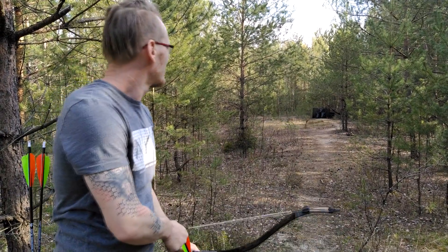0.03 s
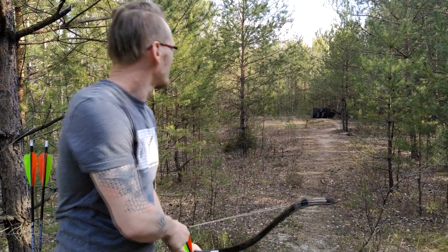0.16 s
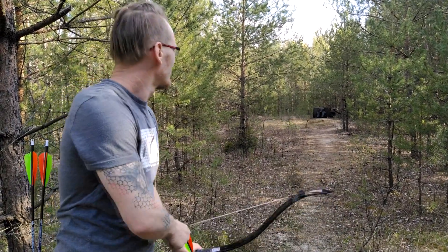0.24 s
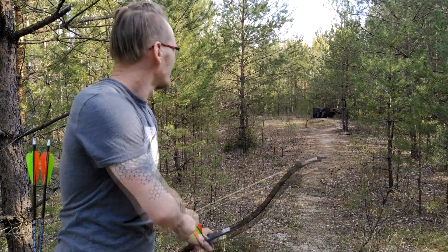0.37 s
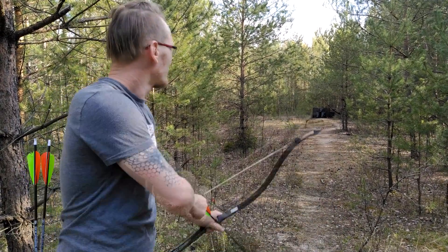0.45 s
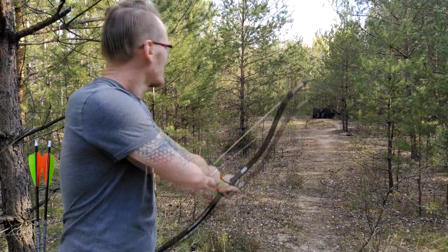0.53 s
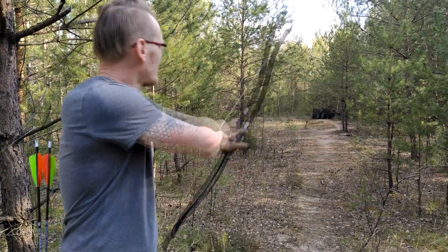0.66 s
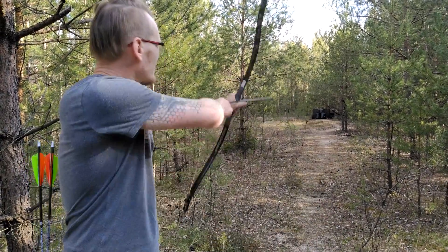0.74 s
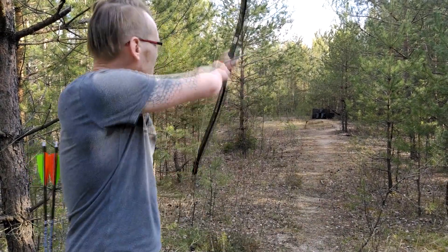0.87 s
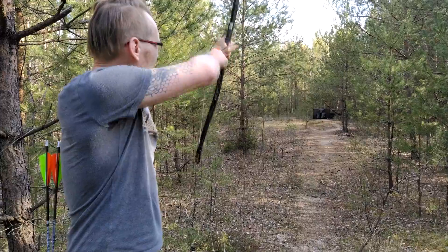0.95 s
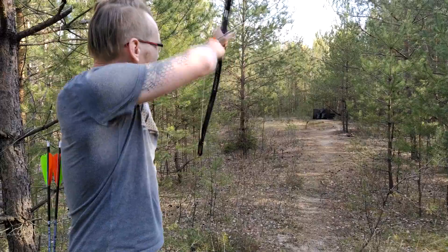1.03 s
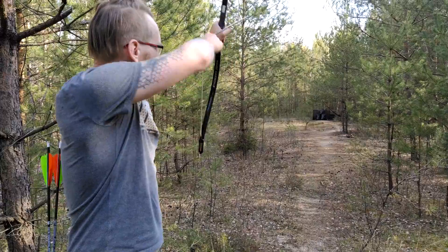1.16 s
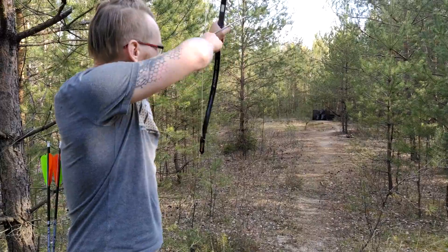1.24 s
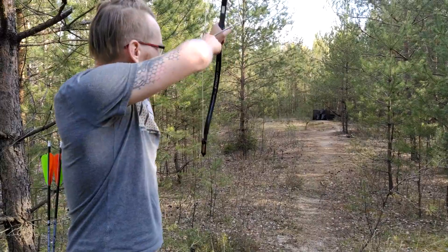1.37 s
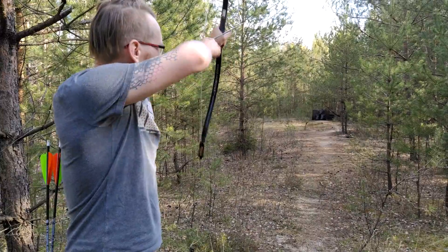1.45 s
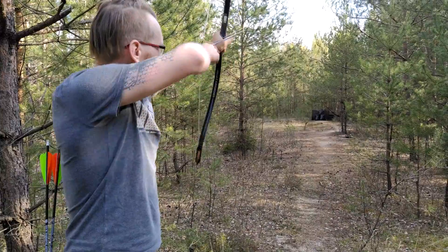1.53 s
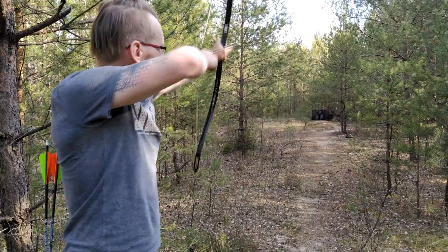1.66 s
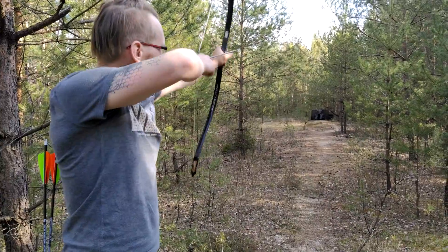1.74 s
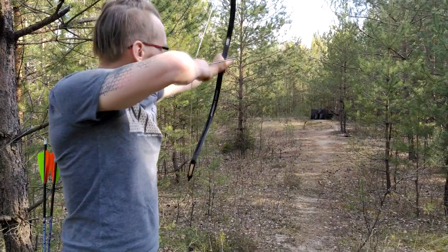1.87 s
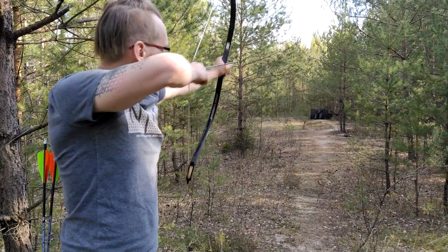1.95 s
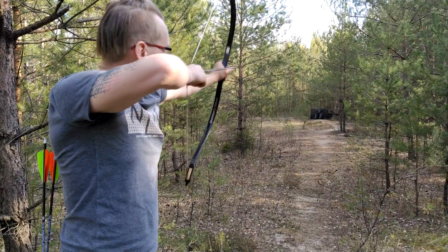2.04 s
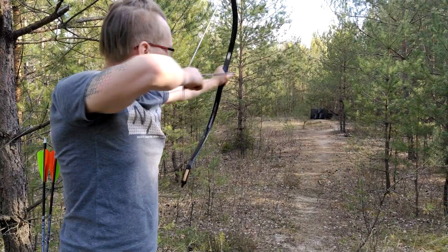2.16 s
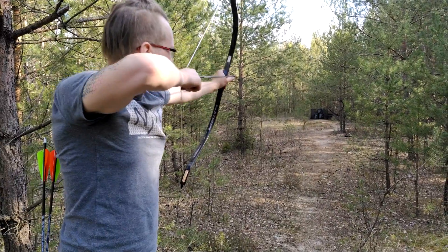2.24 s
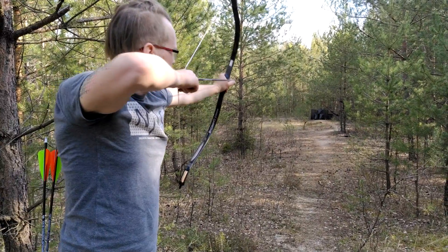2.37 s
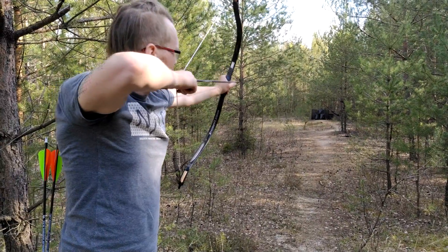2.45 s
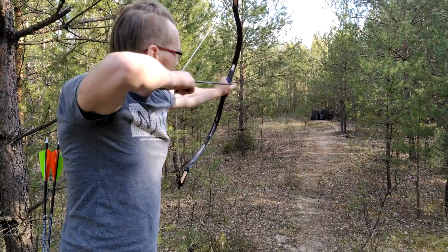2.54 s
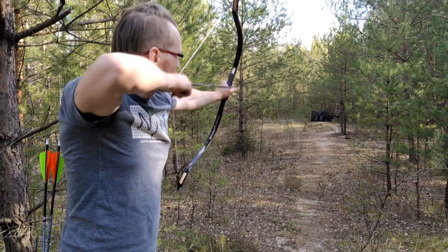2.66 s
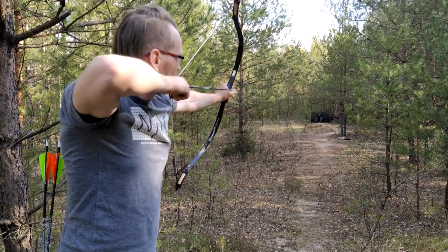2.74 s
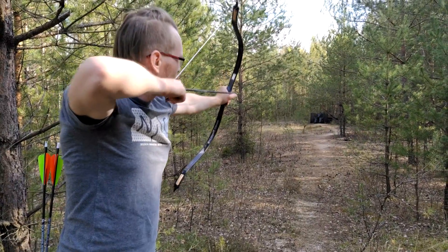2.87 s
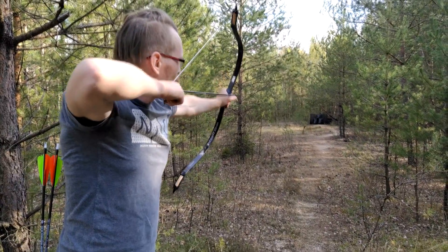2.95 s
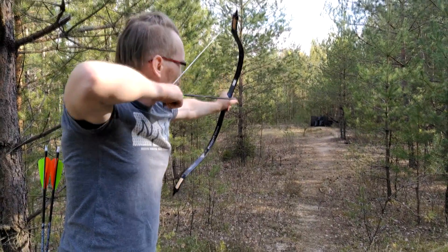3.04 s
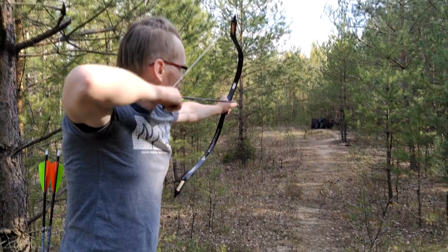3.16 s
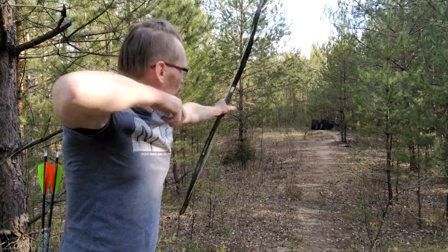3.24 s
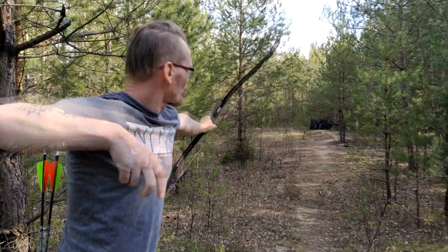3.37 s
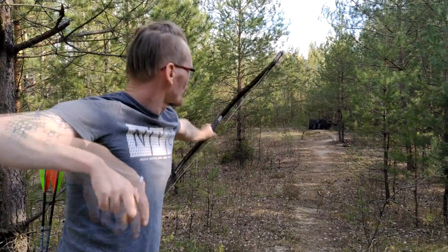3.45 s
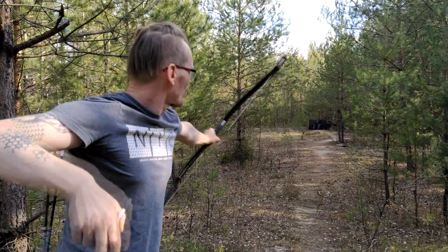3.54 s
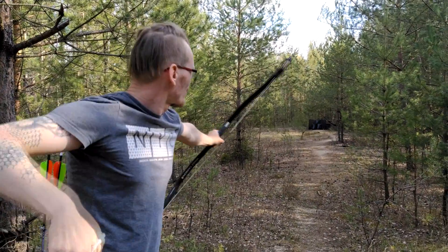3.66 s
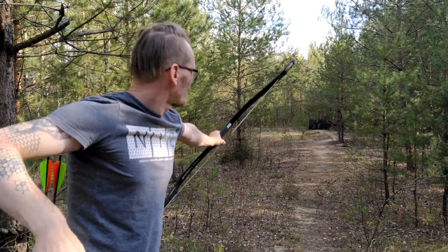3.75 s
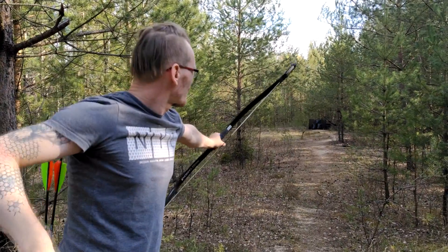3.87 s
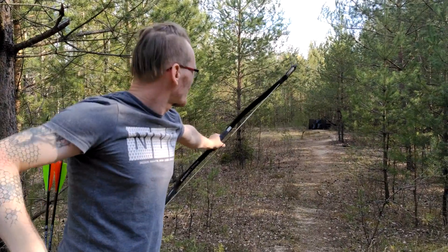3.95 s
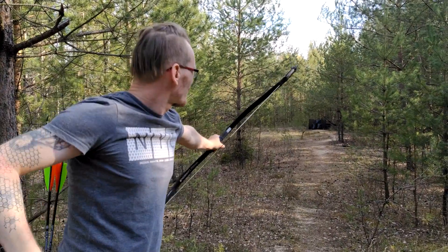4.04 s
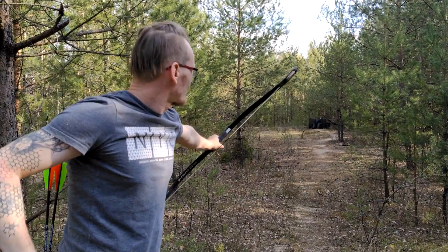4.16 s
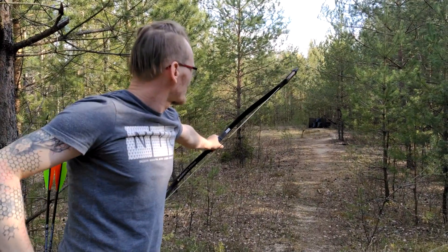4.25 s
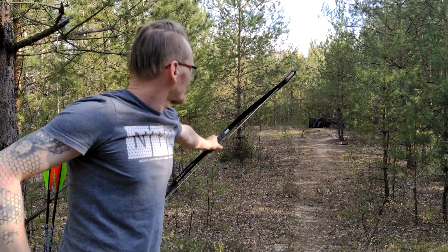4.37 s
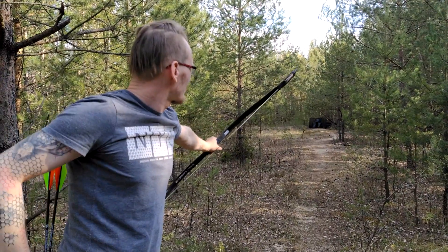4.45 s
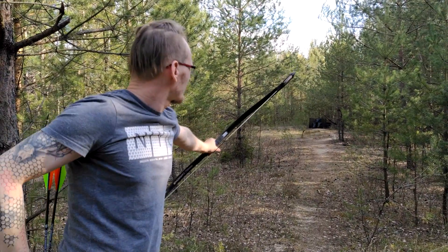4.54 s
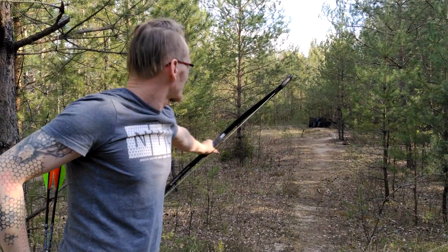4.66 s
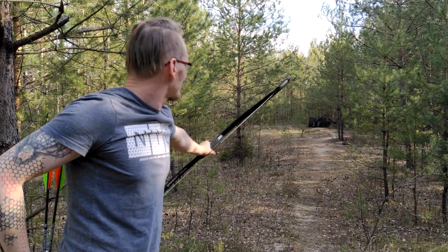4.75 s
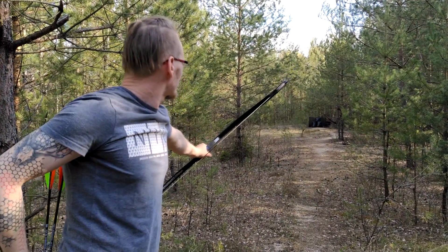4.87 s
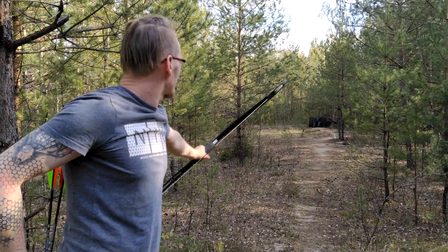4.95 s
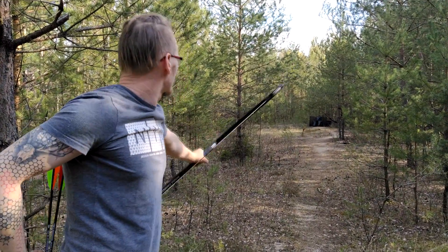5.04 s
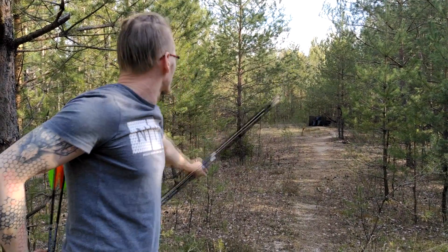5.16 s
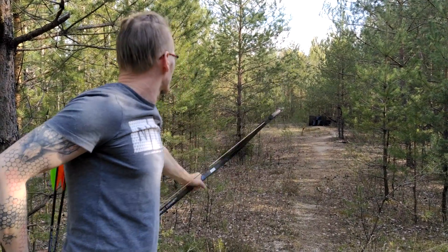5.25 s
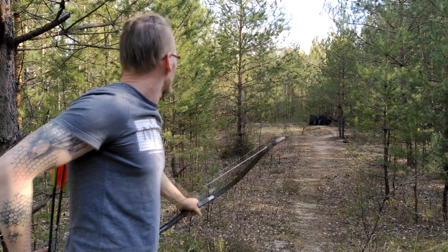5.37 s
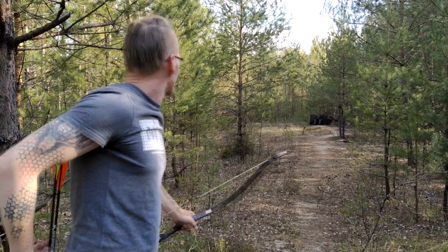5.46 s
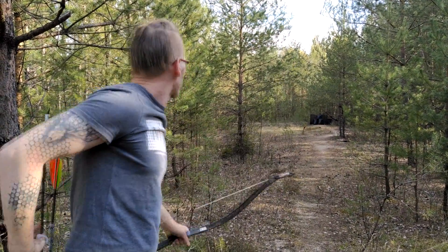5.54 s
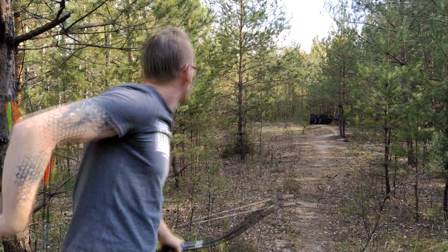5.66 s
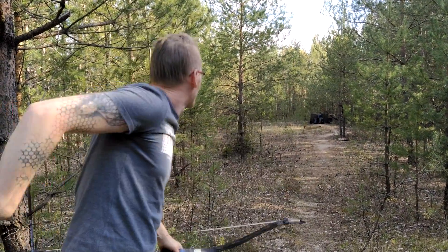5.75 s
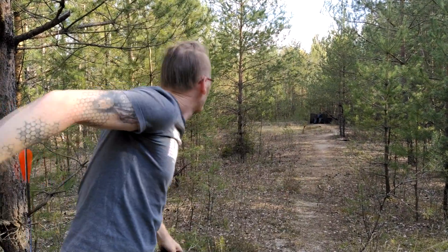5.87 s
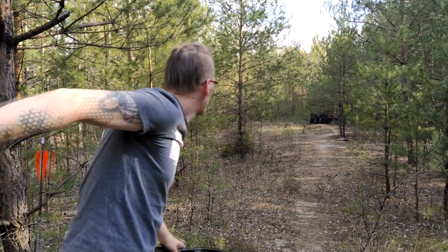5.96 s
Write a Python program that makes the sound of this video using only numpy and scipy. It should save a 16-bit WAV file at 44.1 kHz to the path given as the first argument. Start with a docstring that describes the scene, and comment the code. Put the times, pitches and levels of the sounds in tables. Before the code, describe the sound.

In soft forest air a songbird trills while an archer draws, with faint sleeve rustle and small arrow ticks close to the microphone. The bowstring releases with a loud, sharp snap. Under a second later the arrow thuds into a distant target and echoes among the trees. Then the next arrow rustles, squeaks and clicks out of the quiver, over a very faint far engine hum.

```python
"""Bow shot in a pine forest

An archer draws: sleeves brush, the arrow ticks on the bow, slides off, and the string slams home.
The arrow thuds into a distant target and the trunks scatter the sound; then the next arrow rustles
and squeaks out of a quiver. A songbird trills through the draw and closes with falling slurs,
over soft forest air and, near the end, a faint far engine."""
import sys
import numpy as np
from scipy import signal
from scipy.fft import rfft, irfft
from scipy.io import wavfile

SR = 44100
rng = np.random.default_rng(int(sys.argv[2]) if len(sys.argv) > 2 else 0)


def dump_mix(stems):
    """Bounce the given channels to the path in sys.argv[1] as a 16-bit WAV at rate SR."""
    frames = np.atleast_2d(stems).T  # one column per channel
    limited = np.clip(frames, -1, 1)  # hard clip at full scale
    pcm = np.round(limited * 32767).astype(np.int16)
    wavfile.write(sys.argv[1], SR, pcm)


N = 265041
TIME = np.arange(N) / SR


def from_db(db):
    """Decibels to gain."""
    return 10 ** (np.asarray(db) / 20)


def unit_rms(x):
    """Scale to unit power."""
    return x / np.sqrt(np.mean(x ** 2) + 1e-20)


def at_hz(rows, hz, column=1):
    """Read one column of a table on a log-frequency axis."""
    rows = np.array(rows)
    return np.interp(np.log(np.maximum(hz, 1)), np.log(rows[:, 0]), rows[:, column])


def phase(hz):
    """Running phase of a moving frequency."""
    return 2 * np.pi * np.cumsum(hz) / SR


def drift(rate_hz):
    """Random wander of unit power."""
    knots = rng.standard_normal(16384)
    return unit_rms(np.interp(TIME * rate_hz, np.arange(len(knots)), knots))


def swell(peak_s, rise_s, hold_s, fall_s):
    """Envelope that grows to 1, holds, and dies away."""
    rise = np.minimum(TIME - peak_s, 0) / rise_s
    fall = np.maximum(TIME - peak_s - hold_s, 0) / fall_s
    return np.exp(np.maximum(rise - fall, -40))


def colour(x, spectrum, size=2048):
    """Minimum-phase filter with the given spectrum."""
    gain = from_db(at_hz(spectrum, np.arange(size + 1) * SR / (2 * size)))
    cepstrum = irfft(np.log(gain))
    cepstrum[1:size] *= 2
    cepstrum[size + 1:] = 0
    return signal.oaconvolve(x, irfft(np.exp(rfft(cepstrum))))[:N]


def low_pass(x, hz):
    """Steep treble cut."""
    return signal.sosfilt(signal.ellip(10, .1, 70, hz, fs=SR, output="sos"), x)


def cracks(rows):
    """Each contact chatters: a noise burst that starts at once and dies away."""
    power = np.zeros(N)
    for start_s, db, decay_s, *_ in rows:
        at = round(start_s * SR)
        age = TIME[:min(N - at, SR // 4)]
        power[at:at + len(age)] += (from_db(db) * np.exp(-age / decay_s)) ** 2
    return np.sqrt(power) * rng.standard_normal(N)


def struck(rows, modes, db_column=1):
    """Each blow rings the body's modes as dying sines; neighbours swing in opposite senses."""
    age, out = TIME[:SR // 2], np.zeros(N)
    ring = sum((-1) ** k * from_db(db - 60 * age / t60_s) * np.sin(2 * np.pi * hz * age)
               for k, (hz, db, t60_s) in enumerate(modes))
    for row in rows:
        at = round(row[0] * SR)
        out[at:at + len(age)] += from_db(row[db_column]) * ring[:N - at]
    return out


def rubbing(spectrum, grain_db, clump_db):
    """Fibres catch and slip: noise in tiny grains that come in clumps."""
    grains = rng.standard_normal(N) * from_db(grain_db * drift(1200) + clump_db * drift(110))
    return unit_rms(colour(grains, spectrum))


# String slapping and rattling on the bow. Each row: start in seconds, level in dB, decay in seconds.
STRING_SLAPS = [(3.2886, -12, 0.0029), (3.2912, -7, 0.0035), (3.2972, -16, 0.0067), (3.3095, -34.5, 0.019)]
# Slap spectrum. Each row: frequency in Hz, gain in dB.
SLAP_COLOUR = [(30, -22), (150, -3.5), (800, -2), (1200, -12), (1600, -6), (2300, 3.5), (3000, -1),
               (3900, -0.5), (4800, -4.5), (7000, -7), (11500, -1.5), (13500, -22)]
# String stopping the limbs. Each row: start in seconds, level in dB.
LIMB_STOP = [(3.2941, -14)]
# Bow and string modes. Each row: frequency in Hz, level in dB, T60 in seconds.
BOW_MODES = [(85.4, -36, 0.49), (167, -19.5, 0.22), (205, -14.5, 0.042), (253, -18.5, 0.2),
             (403, -7.5, 0.028), (466, -9, 0.085), (594, -7, 0.048), (727, -8, 0.037), (1238, -19, 0.052),
             (2300, -5, 0.049), (3020, 4.5, 0.016)]


def string_slam():
    """The string snaps taut and the limbs ring."""
    return colour(cracks(STRING_SLAPS), SLAP_COLOUR) + struck(LIMB_STOP, BOW_MODES)


# Friction spectrum. Each row: frequency in Hz, gain in dB.
SLIDE_COLOUR = [(100, -16), (600, -2.5), (1300, -8.5), (2200, 3.5), (3000, 3), (5000, -4.5), (7000, -9),
                (11500, -3), (13500, -24.5)]
# String kicking the shaft. Each row: start in seconds, level in dB.
SHAFT_KICK = [(3.2712, -9)]
# Shaft modes. Each row: frequency in Hz, level in dB, T60 in seconds.
SHAFT_MODES = [(195, -26, 0.054), (722, -3.5, 0.033), (830, -3, 0.019), (1116, -18.5, 0.048)]


def release():
    """The string scuffs off the fingers and kicks the shaft, which rubs past the bow."""
    release_s = SHAFT_KICK[0][0]
    scuff = from_db(-15.5) * swell(release_s, rise_s=0.0029, hold_s=0, fall_s=0.0045)
    rub = from_db(-26.5) * swell(release_s, rise_s=0.002, hold_s=0.012, fall_s=0.009)
    friction = np.hypot(scuff, rub) * rng.standard_normal(N)
    return colour(friction, SLIDE_COLOUR) + struck(SHAFT_KICK, SHAFT_MODES)


# Arrow piercing and stopping. Each row: start in seconds, crack in dB, decay in seconds, push in dB.
TARGET_BLOWS = [(4.0174, -18, 0.0031, -43), (4.0225, -23.5, 0.0039, -39), (4.0251, -28.5, .008, -17)]
# Crack spectrum. Each row: frequency in Hz, gain in dB.
TARGET_COLOUR = [(30, -25), (120, 4.5), (750, 5), (1200, 0), (1800, 3), (2200, 0), (3150, 13), (4300, -5.5),
                 (6000, -4), (8000, 1.5), (9300, -15), (11500, -10.5), (13000, -39)]
# Target modes. Each row: frequency in Hz, level in dB, T60 in seconds.
TARGET_MODES = [(99, -17.5, 0.079), (213, -7.5, 0.025), (295, -3, 0.028), (810, -2, 0.011),
                (1650, -20, 0.04)]
# Scatter on the long path back. Each row: frequency in Hz, gain in dB, T60 in seconds.
FAR_PATH = [(70, -8, 0.47), (140, -2, .45), (446, -4.5, 1), (800, 4.5, 2), (1490, 0, 1.26),
            (2840, 1.5, 0.73), (5460, -13.5, 0.62), (10000, -19.5, 0.23), (13000, -46, 0.27)]


def target(echo_db=3.5):
    """The point cracks in twice, then the target thuds; the wood echoes it all as one blow."""
    piercing = colour(cracks(TARGET_BLOWS), TARGET_COLOUR)
    thud = struck(TARGET_BLOWS, TARGET_MODES, db_column=3)
    impulse = np.zeros(N)
    impulse[round(TARGET_BLOWS[0][0] * SR)] = from_db(echo_db)
    return piercing + thud + trees(impulse, FAR_PATH, build_s=0.0048, uneven_db=-1)


# Arrow on the bow during the draw. Each row: start in seconds, level in dB, decay in seconds.
DRAW_TICKS = [(.631, -53, 0.0051), (2.9200, -38, 0.001), (2.9252, -51, 0.0014), (2.9785, -39, 0.0011)]
# Arrows on hand, bow and quiver; a thin clink as the bow swings out after the shot.
# Each row: start in seconds, tick in dB, decay in seconds, ring in dB.
ARROW_TICKS = [(3.2275, -44.5, 0.0037, -39), (5.039, -60, 0.015, -51), (5.1016, -59, .008, -53),
               (5.203, -53, 0.012, -47), (5.2182, -35, 0.007, -57), (5.4553, -51, .003, -52),
               (5.5182, -49, 0.0034, -58), (5.581, -48.5, 0.0058, -48), (5.8513, -43, 0.014, -64),
               (5.867, -22.5, 0.0032, -33.5), (5.8742, -27, 0.0019, -33), (5.9392, -49.5, .005, -55)]
CLINK = [(3.4245, -38.5, 0.0058, -44)]
# Tick spectra. Each row: frequency in Hz, gain in dB.
DRAW_TICK_COLOUR = [(300, -31), (3000, -2), (4300, 3), (5600, 9), (7500, -2), (11000, 10), (15000, -4)]
TICK_COLOUR = [(300, -1.5), (1500, -1), (3200, -3.5), (4400, -5), (5500, 5), (7300, 0.5), (9300, 13),
               (11500, 6.5), (13000, -14), (15500, -24)]
# Arrow and clink modes. Each row: frequency in Hz, level in dB, T60 in seconds.
ARROW_MODES = [(317, -18.5, 0.22), (835, -13, 0.038), (1780, -14, 0.035), (3140, -5, 0.052),
               (3870, -10.5, 0.05)]
CLINK_MODES = [(4910, 3, 0.068), (5507, -7, 0.072), (7340, -3, 0.088), (8400, -2, 0.061), (9862, -3, 0.081)]


def ticks():
    """Light contacts click brightly and set the shafts ringing."""
    draw = colour(cracks(DRAW_TICKS), DRAW_TICK_COLOUR)
    clicks = colour(cracks(ARROW_TICKS + CLINK), TICK_COLOUR)
    shafts = struck(ARROW_TICKS, ARROW_MODES, db_column=3)
    return draw + clicks + shafts + struck(CLINK, CLINK_MODES, db_column=3)


# Shaft leaving the quiver. Each row: time in seconds, slip rate in Hz.
SLIP_RATES = [(5.62, 430), (5.64, 380), (5.698, 541.3), (5.736, 470), (5.76, 502), (5.8, 670.1),
              (5.828, 740), (5.85, 1100)]
# Squeak harmonics. Each row: multiple of the slip rate, level in dB.
SQUEAK_HARMONICS = [(1, -12.5), (2, -1), (3, -28), (4, -18.5), (5, -25)]


def squeak(holder_hz=551, width_hz=49, jitter=0.0153, rough_db=3, fade_db_per_s=32, edge_s=0.0011):
    """The shaft sticks and slips faster as the pull speeds up, and sings at its holder's resonance."""
    times_s, rates_hz = np.transpose(SLIP_RATES)
    slip_hz = np.interp(TIME, times_s, rates_hz)
    slip_phase = phase(slip_hz * (1 + jitter * drift(300)))
    tone = sum(from_db(db + rough_db * drift(120)) * np.sin(multiple * slip_phase)
               for multiple, db in SQUEAK_HARMONICS)
    age = np.maximum(TIME - times_s[0], 0)
    catch_db = 10 * np.exp(-age / 0.0052)   # the first slip is stronger
    grip = from_db(-39.5 - fade_db_per_s * age + catch_db)
    gate = swell(times_s[0], edge_s, times_s[-1] - times_s[0], edge_s)
    resonance = 1 / np.hypot(1, 2 * (slip_hz - holder_hz) / width_hz)
    return np.sqrt(2) * grip * gate * resonance * tone


# Cloth brushes. Each row: peak time in seconds, level in dB, rise in seconds, fall in seconds.
SLEEVE_BRUSHES = [(.36, -67, 0.15, 0.36), (3.09, -63, 0.06, 0.09), (3.228, -59.5, 0.0365, 0.022)]
# Cloth spectrum. Each row: frequency in Hz, gain in dB.
SLEEVE_COLOUR = [(300, -8), (1500, -9), (4000, -2), (5800, 2), (8000, -6.5), (10500, 5.5), (11900, 5),
                 (12500, -22)]


def sleeves(gain_db=5.5):
    """Cloth rubs as the bow is raised and drawn."""
    brushes = sum(from_db(db + gain_db) * swell(peak_s, rise_s, 0, fall_s)
                  for peak_s, db, rise_s, fall_s in SLEEVE_BRUSHES)
    return brushes * rubbing(SLEEVE_COLOUR, grain_db=3, clump_db=0.9)


# Feather strokes. Each row: start in seconds, length in seconds, starting level in dB.
FEATHER_STROKES = [(5.284, 0.044, -53.5), (5.391, 0.067, -51), (5.527, 0.045, -54.5), (5.631, 0.217, -48),
                   (5.904, .1, -59)]
# Feather spectrum. Each row: frequency in Hz, gain in dB.
FEATHER_COLOUR = [(300, -3), (1500, -1), (3000, -5.5), (4200, -10), (5600, 2), (7300, -11.5), (9300, 7),
                  (11800, 0), (12600, -15), (15500, -16)]


def feathers(growth_db_per_s=12.5):
    """Feathers rub as the next arrow is pulled; each stroke grows as the hand speeds up."""
    strokes = np.zeros(N)
    for start_s, length_s, db in FEATHER_STROKES:
        gain = from_db(db + growth_db_per_s * np.clip(TIME - start_s, 0, length_s))
        strokes += gain * swell(start_s, rise_s=0.013, hold_s=length_s, fall_s=0.011)
    return strokes * rubbing(FEATHER_COLOUR, grain_db=1.5, clump_db=2.4)


def sing(out, start_s, db, hz, wobble, wobble_hz, shape=1):
    """Add one note to out: a sine of unsteady pitch under a rounded arch."""
    at, count = round(start_s * SR), len(hz)
    unsteady_hz = hz * (1 + wobble * drift(wobble_hz)[at:at + count])
    arch = np.sqrt(np.abs(np.sin(np.linspace(0, np.pi, count))))
    out[at:at + count] += from_db(db) * shape * arch * np.sin(phase(unsteady_hz))


# Trill syllables. Each row: start in seconds, buzz in dB, whistle in dB, pitch factor.
SYLLABLES = [(1.783, -72, -65, 1.4), (1.944, -60, -61.5, 1.16), (2.112, -59, -52, 1.04),
             (2.281, -60.5, -50, 0.98), (2.446, -57.5, -48.5, 0.97), (2.614, -54, -47.5, 1),
             (2.777, -54, -47, 0.97), (2.949, -54, -44, 0.99)]


def trill(buzz_s=0.05, buzz_rate_hz=210, whistle_delay_s=0.051, whistle_s=0.064):
    """Each syllable is a buzz, then a whistle that falls, swells to an accent and drops sharply."""
    out = np.zeros(N)
    buzz_age, age = TIME[:round(buzz_s * SR)], TIME[:round(whistle_s * SR)]
    buzz_base_hz = 5080 * (1 + 0.055 * np.sin(2 * np.pi * buzz_rate_hz * buzz_age))
    end_drop_hz = 520 * np.exp((age - whistle_s) / 0.006)
    whistle_base_hz = 4480 - 23500 * age - end_drop_hz
    accent = np.maximum(np.exp(-((age - 0.047) / 0.013) ** 2), from_db(-14))
    for start_s, buzz_db, whistle_db, pitch in SYLLABLES:
        sing(out, start_s, buzz_db, pitch * buzz_base_hz,
             wobble=0.021, wobble_hz=550, shape=np.hanning(len(buzz_age)))
        sing(out, start_s + whistle_delay_s, whistle_db, pitch * whistle_base_hz,
             wobble=0.012, wobble_hz=250, shape=accent)
    return out


# Lone slurs. Each row: start in seconds, length in seconds, first and last pitch in Hz, level in dB.
LONE_SLURS = [(0.09, 0.18, 3300, 2470, -68.5), (1.32, 0.063, 2790, 3370, -72),
              (1.67, 0.038, 4200, 4450, -71), (1.803, 0.041, 4440, 4120, -69),
              (3.145, 0.035, 2200, 3040, -58), (3.204, 0.038, 3200, 2390, -53.5),
              (4.303, 0.12, 2830, 3710, -65)]
# Runs that close the song. Each row: start in seconds, note spacing in seconds, level in dB.
SLUR_RUNS = [(3.445, .052, -54), (3.682, .046, -56)]


def slurs(top_hz=3780, step_ratio=0.81, fall_ratio=0.89, note_s=0.034):
    """Hoarse gliding notes, alone or in runs of three that step downwards."""
    out, notes = np.zeros(N), list(LONE_SLURS)
    for start_s, spacing_s, db in SLUR_RUNS:
        for k in range(3):
            hz = top_hz * step_ratio ** k
            notes.append((start_s + k * spacing_s, note_s, hz, hz * fall_ratio, db))
    for start_s, length_s, from_hz, to_hz, db in notes:
        glide_hz = np.linspace(from_hz, to_hz, round(length_s * SR))
        sing(out, start_s, db, glide_hz, wobble=0.03, wobble_hz=600)
    return out


# Treetop scatter. Each row: frequency in Hz, gain in dB, T60 in seconds.
TREETOPS = [(1990, -5, .7), (3300, -5, 1.0), (5000, -2.5, .9), (8000, -6, .4)]


def bird(flutter_db=1.7):
    """Branches in the way make the song flutter; the treetops return a soft wash."""
    song = np.sqrt(2) * (trill() + slurs()) * from_db(flutter_db * drift(180))
    blurred = song * (0.35 + 0.95 * drift(1300))   # fast modulation smears the pitch
    echo = trees(blurred, TREETOPS, build_s=0.02, uneven_db=1)
    return from_db(-1.15) * song + from_db(0.5) * echo


def trees(x, scatter, build_s, uneven_db):
    """Countless trunks return echoes of uneven strength; each half octave dies at its own rate."""
    age, response = TIME[:SR * 3 // 2], 0
    edges_hz = 60 * 2 ** (np.arange(17) / 2)
    trunks = from_db(uneven_db * np.repeat(rng.standard_normal(len(age)), 40)[:len(age)])
    build_up = 1 - np.exp(-(age / build_s) ** 2)
    echoes = rng.standard_normal((2, len(age))) * trunks * build_up
    for k, (low_hz, high_hz) in enumerate(zip(edges_hz, edges_hz[1:])):
        hz = np.sqrt(low_hz * high_hz)
        dying = echoes[k % 2] * from_db(-60 * age / at_hz(scatter, hz, column=2))
        band = signal.sosfilt(signal.butter(2, [low_hz, high_hz], "band", fs=SR, output="sos"), dying)
        response = response + from_db(at_hz(scatter, hz)) * band / np.linalg.norm(dying)
    return signal.fftconvolve(x, response)[:N]


# Near and deep forest scatter. Each row: frequency in Hz, gain in dB, T60 in seconds.
CLOSE_TREES = [(100, -5, 1), (393, -12.5, 0.33), (826, -14.5, 0.13), (1300, -7, 0.15), (2500, -18, 0.66),
               (5000, -15, 0.22), (11000, -13, 0.23)]
DEEP_TREES = [(100, -19, 0.49), (400, -24, 0.71), (1000, -18, 0.73), (2500, -22, 1), (5000, -20, 1),
              (11000, -21.5, 0.99)]


def forest_echo(x):
    """The ground and nearby trunks answer first, then the wood around."""
    close = trees(x, CLOSE_TREES, build_s=0.004, uneven_db=3)
    return close + trees(x, DEEP_TREES, build_s=0.025, uneven_db=2.5)


# Air spectrum. Each row: frequency in Hz, gain in dB.
AIR_COLOUR = [(15, -46), (25, -13.5), (49, -5), (103, -1.5), (168, -6), (304, -3.5), (364, -8), (459, -6.5),
              (523, -10.5), (875, -8), (945, -8.5), (1620, -15.5), (2650, -19.5), (5310, -23), (11800, -21),
              (15300, -63), (22000, -120)]


def forest_air(level_db=-57.5, top_hz=12150):
    """Soft air in the pines, wavering slightly in level."""
    air = unit_rms(low_pass(colour(rng.standard_normal(N), AIR_COLOUR), top_hz))
    return from_db(level_db + 0.5 * drift(3.16)) * air


# Engine partials. Each row: harmonic number, peak time in seconds, hold in seconds, level in dB.
ENGINE_PARTIALS = [(2, 4.6, 0.67, -64), (1, 5.3, 0.63, -63)]


def engine(start_s=4.44, from_hz=140, top_hz=163, run_up_s=0.25):
    """A far engine runs up to speed; its partials swell in turn and waver on the way."""
    age = np.maximum(TIME - start_s, 0)
    hz = top_hz - (top_hz - from_hz) * np.exp(-age / run_up_s)
    turn = phase(hz * (1 + 0.0051 * drift(25)))
    hum = sum(from_db(db) * swell(peak_s, 0.17, hold_s, 0.074) * np.sin(round(multiple) * turn)
              for multiple, peak_s, hold_s, db in ENGINE_PARTIALS)
    return np.sqrt(2) * hum * from_db(2.3 * drift(14))


def scene():
    """Near sounds are almost dry; the bird and the target come through the trees."""
    shot = release() + string_slam()
    handling = ticks() + sleeves() + feathers() + squeak()
    echo = forest_echo(shot + from_db(-3) * handling)   # the quiver is closer than the bow, so drier
    return (shot + handling + echo + target() + bird() + forest_air() + engine())[None]


def record(dry):
    """The top is cut."""
    return low_pass(dry, hz=15900)


dry = scene()
out = record(dry)
dump_mix(out)
```